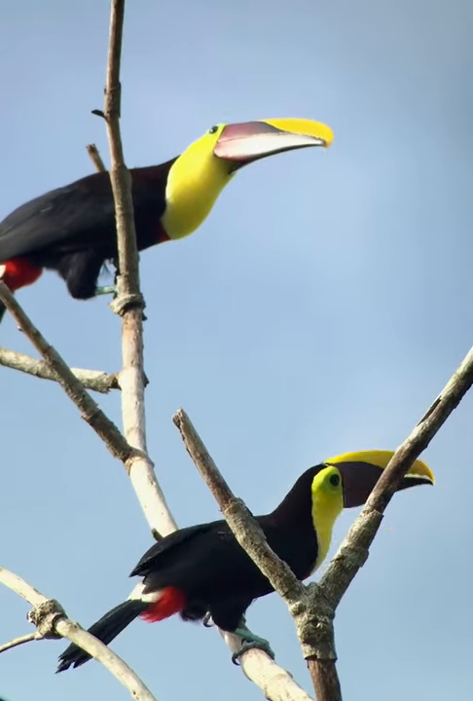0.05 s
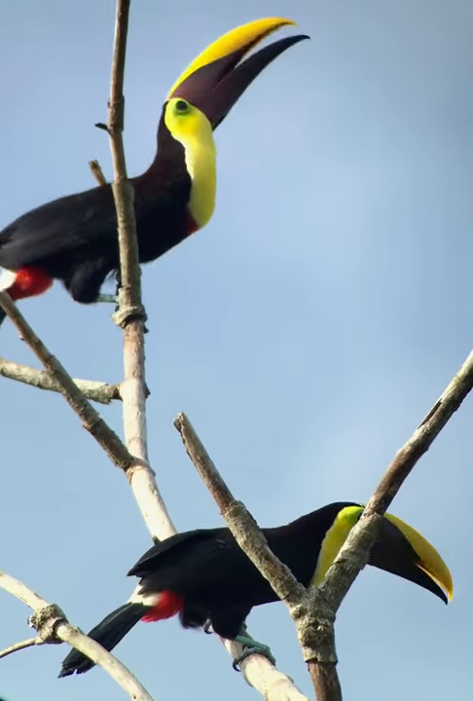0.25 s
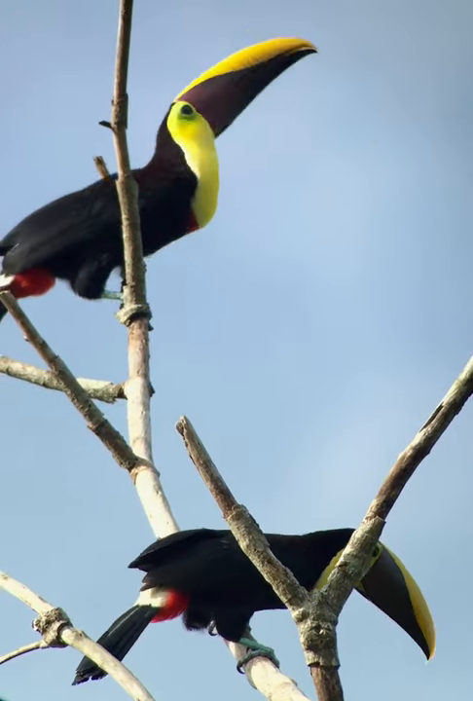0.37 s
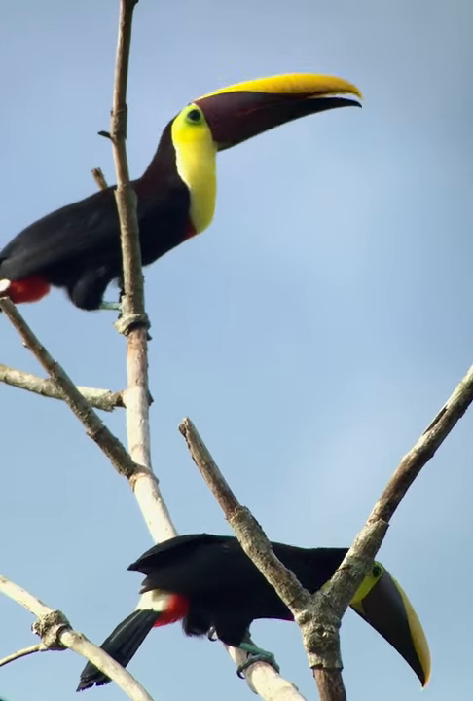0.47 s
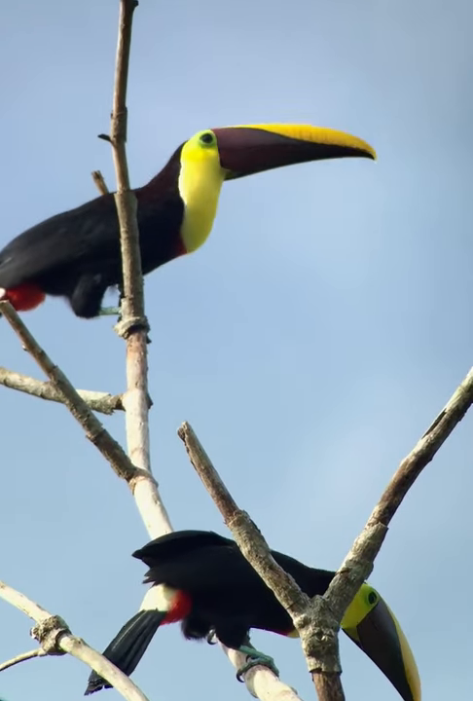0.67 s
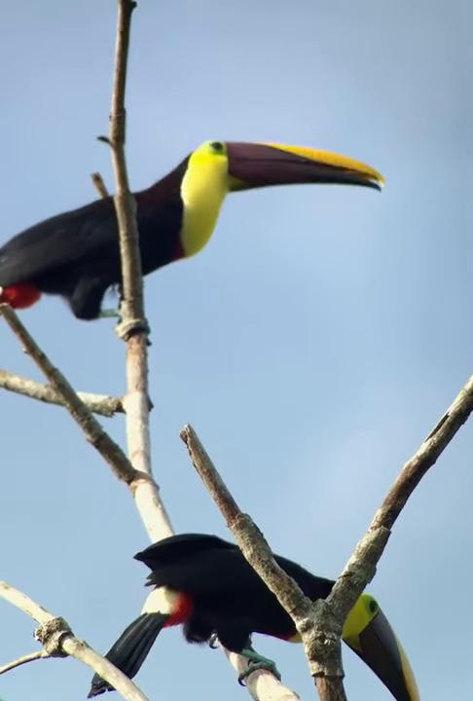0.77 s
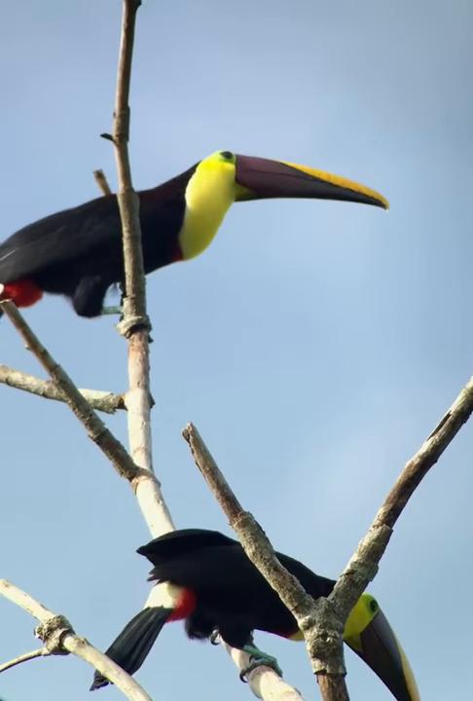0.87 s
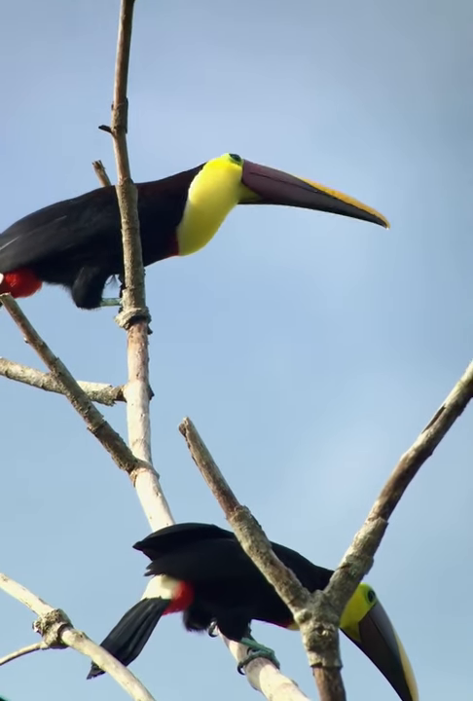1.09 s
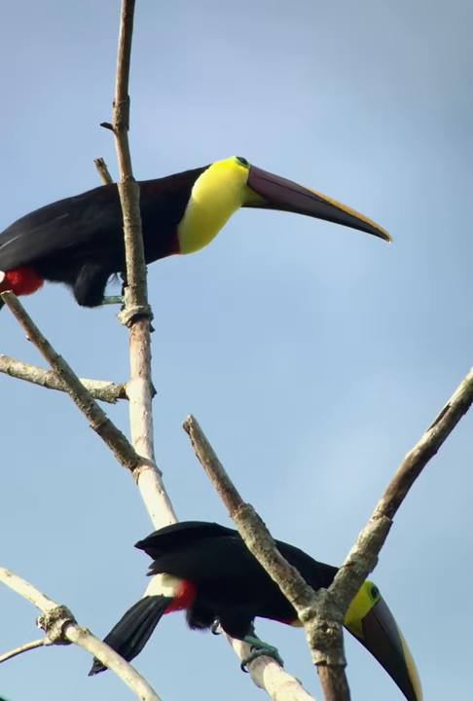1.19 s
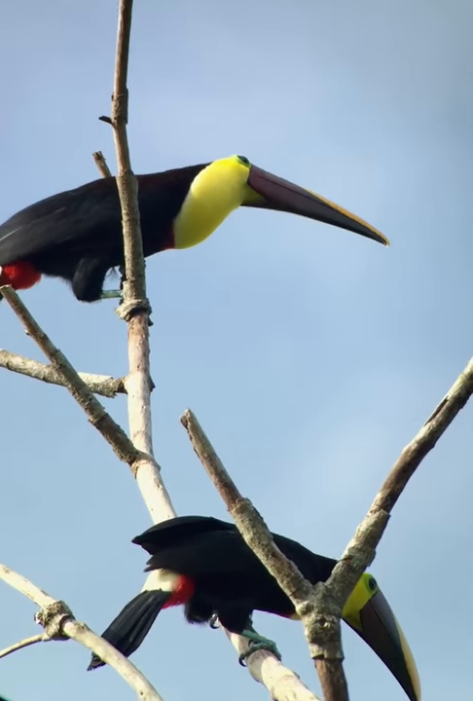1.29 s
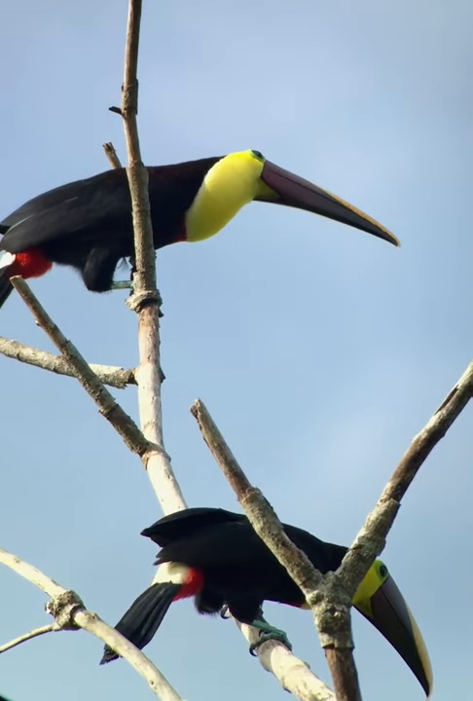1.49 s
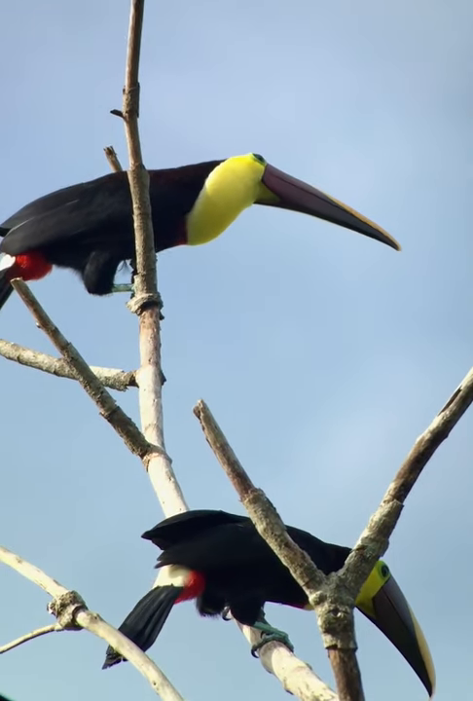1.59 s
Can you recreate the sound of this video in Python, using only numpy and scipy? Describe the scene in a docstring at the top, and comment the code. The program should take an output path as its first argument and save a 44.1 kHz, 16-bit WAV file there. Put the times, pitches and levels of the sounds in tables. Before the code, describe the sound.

Five quick toucan yelps slide from whistle to rasp over faint forest background noise.

```python
"""In a forest, a toucan on a bare branch gives five short yelps: each starts as a pure whistle, falls in
pitch and breaks into a rasp. Soft throaty clucks lead into most of them and close the last.
Further off are a fainter yelp, thin twitters, low hoots and a small bird's falling whistle.
The trees answer the toucan with a long tail, over a low hum, a few dull bumps and faint hiss."""
import sys
import numpy as np
from scipy import signal
from scipy.fft import rfft, irfft
from scipy.io import wavfile

SR = 44100
rng = np.random.default_rng(int(sys.argv[2]) if len(sys.argv) > 2 else 0)


def output_pcm(signal):
    """Save a mono or channel-first signal as 16-bit PCM at the path in sys.argv[1].

    Samples are clipped to [-1, 1] before scaling.
    """
    pcm = np.clip(np.atleast_2d(signal).T, -1, 1) * 32767
    wavfile.write(sys.argv[1], SR, np.round(pcm).astype(np.int16))


N = 72765
T = np.arange(N) / SR


def amp(db):
    """Decibels to gain."""
    return 10 ** (np.asarray(db) / 20)


def unit(x):
    """Scale to rms 1."""
    return x / np.sqrt(np.mean(x ** 2) + 1e-20)


def curves(rows):
    """Automation: each column after the first, joined by straight lines in time."""
    times, *columns = np.transpose(rows)
    return [np.interp(T, times, column) for column in columns]


def colour(x, eq):
    """EQ through points of (frequency [Hz], gain [dB])."""
    hz, db = np.transpose(eq)
    bins_hz = np.maximum(np.fft.rfftfreq(len(x), 1 / SR), 1)
    return irfft(rfft(x) * amp(np.interp(np.log(bins_hz), np.log(hz), db)), len(x))


def noise(eq):
    """Coloured noise, rms 1."""
    return unit(colour(rng.standard_normal(N), eq))


def wander(hz):
    """Random modulation between hz / 10 and hz, rms 1."""
    band = signal.butter(2, [hz / 10, hz], "band", fs=SR, output="sos")
    return unit(signal.sosfilt(band, rng.standard_normal(N)))


def cycle(hz):
    """Running phase of a pitch curve, from a random start."""
    return 2 * np.pi * (np.cumsum(hz) / SR + rng.random())


def gate(rows, fade_s=.0015):
    """Open from a call's first row to its last, with a quick fade either side."""
    attack = np.clip((T - rows[0][0]) / fade_s + 1, 0, 1)
    release = np.clip((rows[-1][0] - T) / fade_s + 1, 0, 1)
    return np.sin(np.pi / 2 * attack * release) ** 2


def swell(at, width):
    """Bell-shaped envelope; centre and width in seconds."""
    return np.exp(-((T - at) / width) ** 2 / 2)


def blips(rows):
    """Short sine tones that swell and fade."""
    return sum(amp(db) * swell(at, width) * np.sin(2 * np.pi * hz * (T - at))
               for at, db, hz, width in rows)


def hum(pitch_hz=87.44, waver_db=2):
    """A low, slightly wavering hum with its octave, like a far engine, in a bed of rumble."""
    # hum faders: (time [s], fundamental [dB], octave [dB])
    levels = [(0, -58, -60), (.3, -55.5, -66), (.6, -59, -66.5), (.9, -57, -75.5), (1.15, -60, -87),
              (1.45, -60.5, -88.5), (1.65, -57.5, -65)]
    # rumble fader: (time [s], level [dB])
    rumble_levels = [(0, -66.5), (.35, -63), (.8, -65.5), (1.2, -68.5), (1.65, -66.5)]
    # dark tone of the rumble: (frequency [Hz], gain [dB])
    rumble_eq = [(40, -14), (70, -5.5), (130, 3.5), (240, -1), (400, -8), (800, -33.5)]
    fundamental, octave = amp(curves(levels))
    phase = cycle(pitch_hz * (1 + .018 * wander(8)))
    tone = np.sqrt(2) * (fundamental * np.sin(phase) + octave * np.sin(2 * phase))
    return tone * amp(waver_db * wander(20)) + amp(curves(rumble_levels)[0]) * noise(rumble_eq)


def hiss(level_db=-64):
    """A steady bed of outdoor noise."""
    # full lows, soft top: (frequency [Hz], gain [dB])
    eq = [(20, -12), (50, 11.5), (150, -2.5), (300, -1.5), (550, -2), (1000, -2.5), (1900, -1.5),
          (3000, -13), (4300, -18), (5700, -15.5), (7000, -20), (9200, -21), (10200, -30), (13000, -23),
          (15500, -31.5)]
    return amp(level_db) * noise(eq)


def voice_band(x, edges_hz=(1270, 3830)):
    """The toucan's range: steep edges below the fundamental and above the octave."""
    return signal.sosfilt(signal.butter(5, edges_hz, "band", fs=SR, output="sos"), x)


def clucks(rise_s=.00096, jitter_hz=580):
    """Each cluck is a quickly dying ring of the throat with an unsteady pitch."""
    # throat pulses: (time [s], level [dB], pitch [Hz], decay [s], roughness [times jitter_hz])
    pulses = [(0.195, -45, 2250, 0.0037, .4), (0.2006, -33, 2200, .004, 0.37),
              (.217, -41, 2160, 0.0026, 0.1), (.431, -44, 2200, .004, 0.7),
              (0.539, -46.5, 2200, 0.011, 1.2), (0.787, -35, 2145, 0.0019, 1.2),
              (.790, -47, 1810, 0.0025, 1), (1.1399, -26.5, 2450, 0.0021, 0.46),
              (1.1448, -21.5, 2350, 0.0012, .6)]
    out = np.zeros(N)
    for at, db, hz, decay, rough in pulses:
        age = np.maximum(T - at, 0)
        envelope = (1 - np.exp(-age / rise_s)) * np.exp(-age / decay)
        out += amp(db) * envelope * np.sin(cycle(hz + rough * jitter_hz * wander(1300)))
    return voice_band(out)


def echoes(db, t60_s, predelay_s=.0072):
    """Reverb impulse: dense, dying echoes of a click."""
    age = np.maximum(T - predelay_s, 0)
    scatter = rng.standard_normal(N) * (age > 0) * np.exp(-np.log(1000) * age / t60_s)
    return amp(db) * unit(scatter) / np.sqrt(N)


def forest(send):
    """Scatter from near branches dies fast, that from far trees slowly."""
    # tone of the echoes: (frequency [Hz], gain [dB])
    eq = [(900, -17), (1400, -4), (1700, 0.5), (1950, -10), (2300, 1.5), (2800, -3.5), (3150, 7),
          (3450, 12.5), (3800, 2), (5400, 6.5), (6300, 5.5), (9000, -12.5)]
    branches, trees = echoes(db=-12, t60_s=.3), echoes(db=-16, t60_s=.87)
    return signal.fftconvolve(colour(send, eq), branches + trees)[:N]


def bill(x, centre_hz=5420, width_hz=210):
    """The bill's narrow resonance, which picks out the third harmonic."""
    return signal.lfilter(*signal.iirpeak(centre_hz, centre_hz / width_hz, fs=SR), x + 1e-18)


def yelp(rows, flutter_hz=206.2, flutter_depth=.19, rasp_db=-5, third_db=-37.5):
    """A falling tone whose octave takes over while jitter, flutter and rasp grow."""
    # tone of the rasp riding on the octave: (frequency [Hz], gain [dB])
    rasp_eq = [(600, -40.5), (950, -20), (1150, -24.5), (1450, 1.5), (2200, -6), (3100, 3.5), (3500, -27.5),
               (3900, -50)]
    hz, fundamental_db, octave_db = curves(rows)
    start, end = rows[0][0], rows[-1][0]
    rough = np.clip((T - start) / (end - start), 0, 1) ** 1.6  # the voice breaks late in the yelp
    jitter = (.0015 + .022 * rough) * wander(350)
    phase = cycle(hz * (1 + jitter))
    flutter = 1 + flutter_depth * rough * np.sin(cycle(flutter_hz * (1 + .44 * wander(100))))
    fundamental, octave = gate(rows) * flutter * amp([fundamental_db, octave_db])
    rasp = amp(rasp_db) * rough * noise(rasp_eq)
    body = fundamental * np.sin(phase) + octave * (np.sin(2 * phase) + rasp)
    third = fundamental * np.sin(3 * phase)
    return voice_band(body) + amp(third_db) * bill(third)


def toucan():
    """Five yelps up close, each sliding down from whistle to rasp."""
    # one contour per yelp: (time [s], pitch [Hz], fundamental [dB], octave [dB])
    contours = [
        [(.228, 1853, -42.5, -57.5), (.2315, 1819, -38, -49.5), (.234, 1860, -26, -46),
         (.246, 1817, -23.5, -52), (.263, 1731, -38.5, -52.5), (.277, 1632, -32.5, -46.5),
         (.286, 1505, -34.5, -48), (.291, 1296, -45.5, -37), (.294, 1290, -60, -42.5)],
        [(.453, 1790, -40.5, -62.5), (.459, 1724, -36.5, -52), (.470, 1769, -41.5, -47.5),
         (.475, 1645, -33, -45.5), (.481, 1357, -45.5, -42.5), (.484, 1330, -44, -40.5)],
        [(.566, 1783, -38, -51), (.573, 1804, -23.5, -39), (.588, 1739, -23, -49), (.602, 1643, -35, -39.5),
         (.607, 1577, -28, -45.5), (.623, 1498, -40.5, -46.5), (.636, 1434, -36, -44), (.651, 1325, -37, -35),
         (.658, 1202, -47, -40)],
        [(.8085, 1764, -38.5, -71), (.8135, 1710, -28.5, -52), (.8195, 1693, -25.5, -44),
         (.8285, 1656, -34, -43), (.8345, 1562, -30, -30.5), (.838, 1489, -40, -40.5), (.8403, 1375, -44, -28),
         (.843, 1350, -46, -38.5)],
        [(1.1155, 1699, -38.5, -70), (1.1205, 1649, -46, -53), (1.1235, 1615, -28.5, -37.5),
         (1.128, 1604, -28, -37.5), (1.130, 1522, -28, -32), (1.133, 1541, -34.5, -33.5),
         (1.1355, 1438, -39, -27.5), (1.1378, 1300, -50, -30)],
    ]
    return sum(yelp(rows) for rows in contours)


def fizz():
    """Bright puffs of noise on the peaks of the loudest yelps."""
    # puffs: (time [s], level [dB], width [s])
    puffs = [(0.242, -69.5, 0.0027), (0.575, -57, 0.0025), (0.832, -66, 0.011), (1.134, -55.5, 0.0042)]
    # their airy tone: (frequency [Hz], gain [dB])
    eq = [(1000, 1), (4000, 4), (6300, 6.5), (9000, -12.5), (15000, -5.5)]
    return noise(eq) * sum(amp(db) * swell(at, width) for at, db, width in puffs)


def twitters():
    """Tiny high pips from birds far off."""
    # pips: (time [s], level [dB], pitch [Hz], width [s])
    pips = [(.356, -69, 5730, 0.0027), (.427, -72.5, 5650, .003), (.447, -71.5, 5750, .002),
            (1.265, -74, 5800, 0.0037), (1.29, -75, 5720, 0.0029), (1.375, -76, 5610, 0.0054)]
    return blips(pips)


def hoots():
    """Faint, low, round notes in the distance."""
    # notes: (time [s], level [dB], pitch [Hz], width [s])
    notes = [(.36, -60, 250, 0.024), (.49, -60.5, 391, 0.012), (.58, -60.5, 363, 0.0071),
             (.86, -58, 172.5, 0.02), (1.05, -59, 248, 0.0091)]
    return blips(notes)


def bumps():
    """Dull thuds, each a few bass cycles at most."""
    # thuds: (time [s], level [dB], pitch [Hz], width [s])
    thuds = [(0.408, -54, 57.6, 0.027), (0.617, -46.5, 56, 0.018), (0.658, -55, 50, 0.026),
             (0.72, -41, 66, 0.0047), (0.788, -47.5, 58, 0.0081), (0.926, -53, 59, 0.0072),
             (1.281, -42.5, 64.3, 0.0062), (1.315, -47, 55, 0.0042)]
    return blips(thuds)


def far_yelp():
    """One fainter yelp from further off."""
    # its contour: (time [s], pitch [Hz], fundamental [dB], octave [dB])
    contour = [(.734, 2111, -53, -84), (.743, 2008, -44, -105), (.756, 1702, -50, -78),
               (.770, 1633, -42.5, -60), (.782, 1572, -54, -52)]
    return yelp(contour)


def small_bird():
    """One thin falling whistle, smeared by the leaves."""
    # the whistle's glide: (time [s], pitch [Hz], level [dB])
    glide = [(.738, 5230, -70), (.752, 5190, -64.5), (.762, 5170, -51), (.785, 4860, -55.5),
             (.81, 4520, -56), (.835, 4270, -61.5), (.862, 4070, -67.5), (.88, 3760, -72),
             (.908, 3940, -64), (.93, 4100, -72)]
    hz, db = curves(glide)
    tone = gate(glide) * amp(db) * np.sin(cycle(hz * (1 + .0023 * wander(300))))
    leaves = echoes(db=-3.5, t60_s=.36)
    return tone + signal.fftconvolve(tone, leaves)[:N]


def scene(cluck_send_db=-10, far_send_db=8):
    """Mono mix: the toucan up front, its clucks drier, the far birds wetter, the bed underneath."""
    near = toucan() + fizz()
    throat = clucks()
    far = far_yelp() + twitters()
    tail = forest(near + amp(cluck_send_db) * throat + amp(far_send_db) * far)
    return (near + throat + far + small_bird() + tail + hoots() + bumps() + hum() + hiss())[None]


def record(dry):
    """A steep high cut on the whole mix."""
    cutoff_hz = 15700
    return signal.sosfilt(signal.ellip(12, .1, 70, cutoff_hz, fs=SR, output="sos"), dry)


dry = scene()
out = record(dry)
output_pcm(out)
```